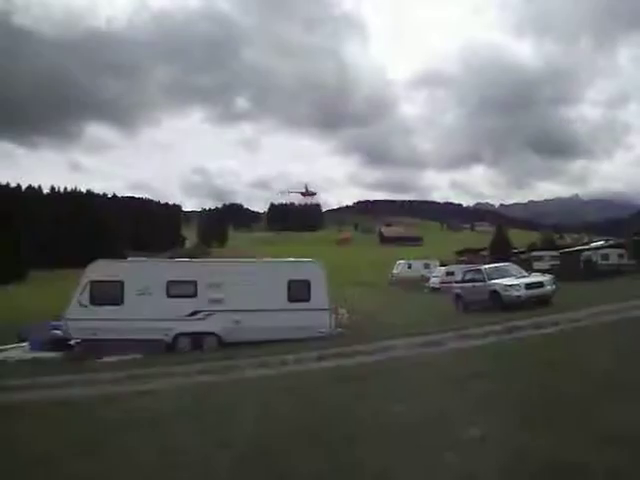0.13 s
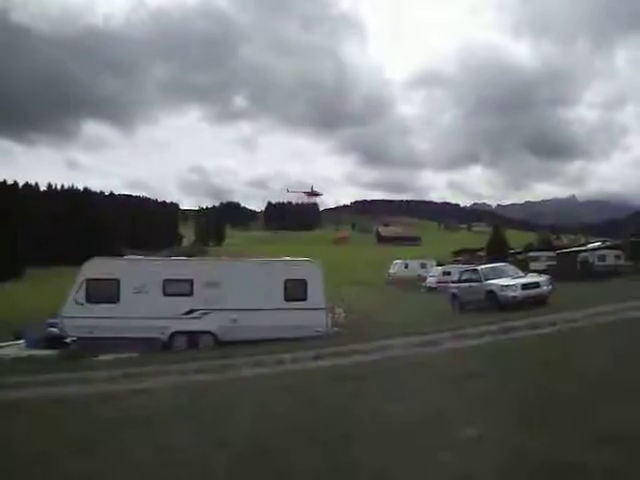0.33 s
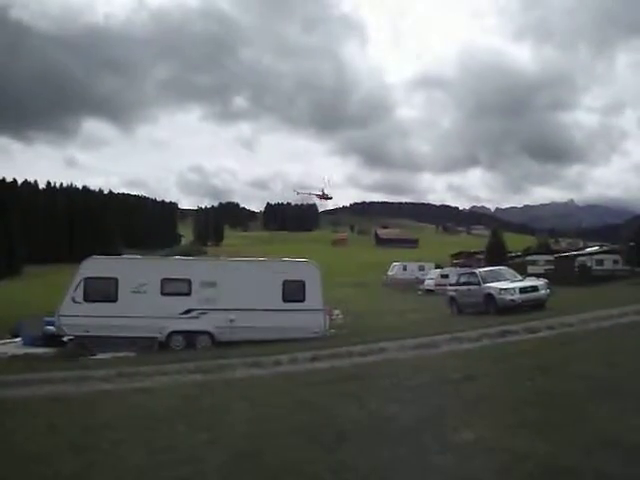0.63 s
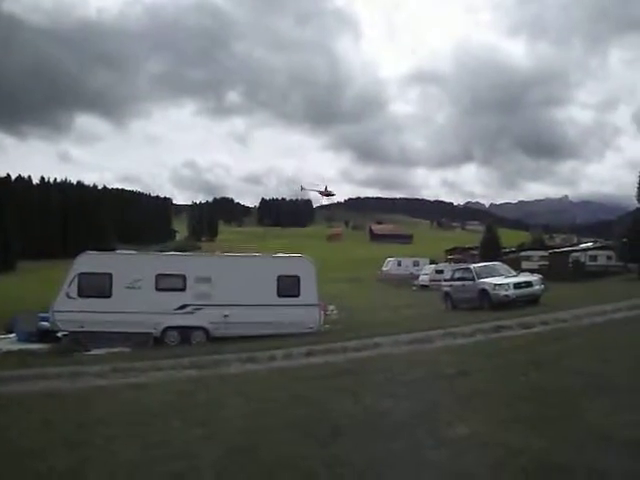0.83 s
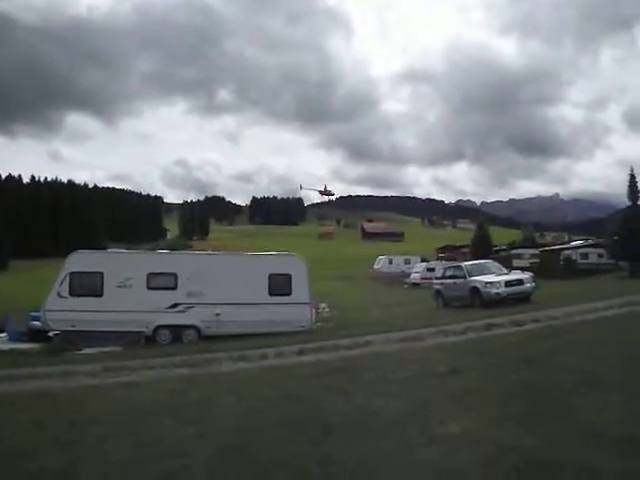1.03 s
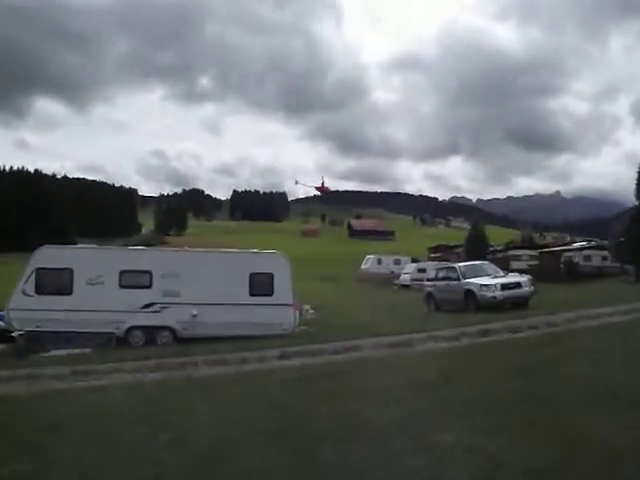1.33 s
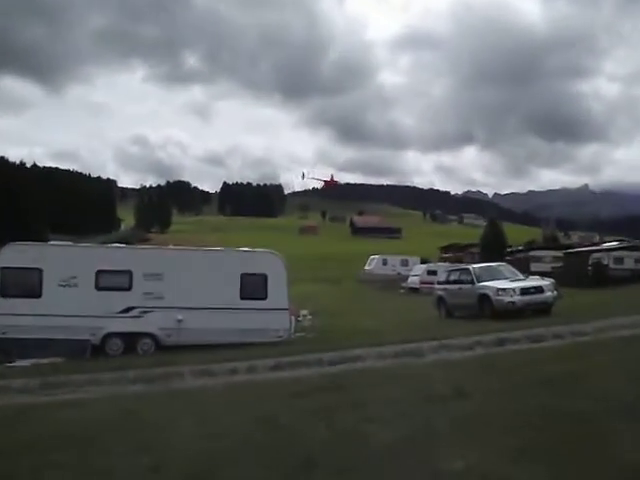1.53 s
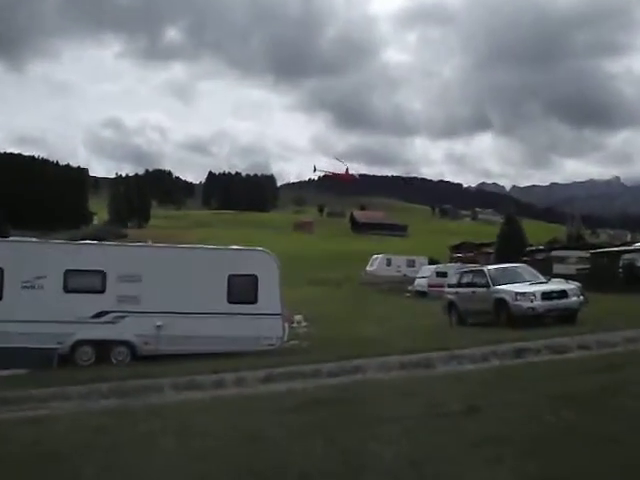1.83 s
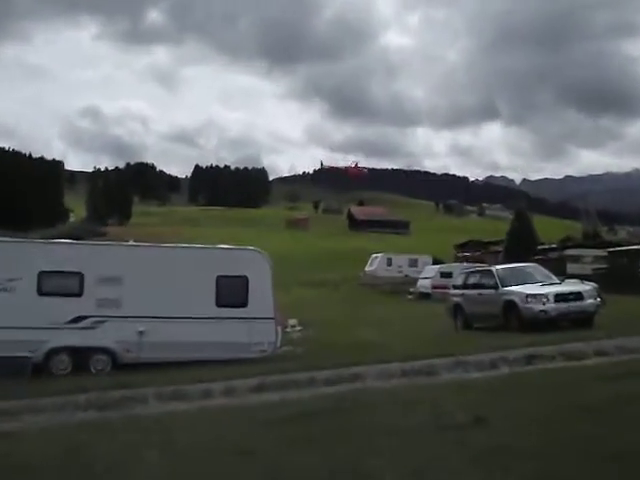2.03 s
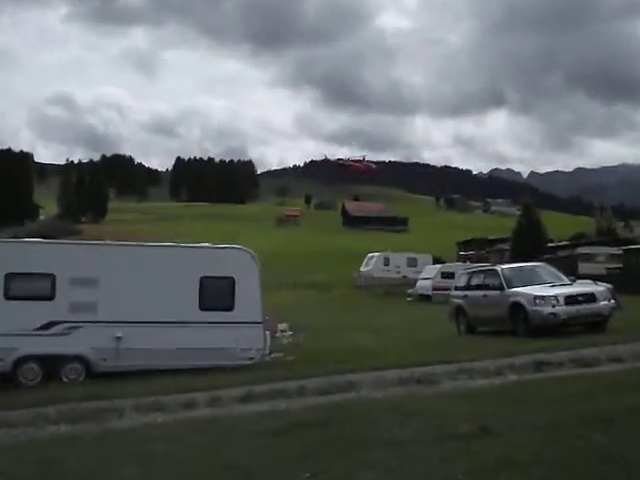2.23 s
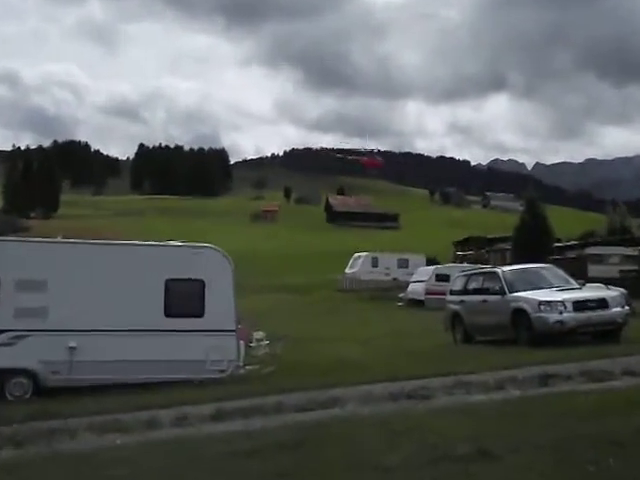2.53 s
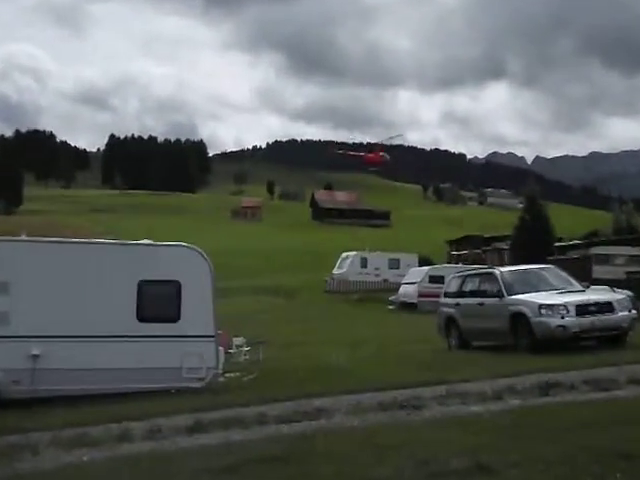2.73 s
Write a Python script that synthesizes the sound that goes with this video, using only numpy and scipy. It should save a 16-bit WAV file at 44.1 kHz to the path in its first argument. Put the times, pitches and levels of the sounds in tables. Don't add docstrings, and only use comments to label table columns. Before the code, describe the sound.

Helicopter drones and thumps in the distance over an open meadow, with rough wind on the microphone

```python
import sys
import numpy as np
from scipy import signal
from scipy.fft import rfft, irfft, next_fast_len
from scipy.io import wavfile
from scipy.ndimage import uniform_filter1d, map_coordinates

SR = 44100
rng = np.random.default_rng(int(sys.argv[2]) if len(sys.argv) > 2 else 0)


def boost(x):
    u = np.asarray(x, float) / 20
    return 10 ** u


def generate_wav(signal):
    frames = np.transpose(np.atleast_2d(signal))
    scaled = np.clip(frames, -1, 1) * 32767
    pcm = np.round(scaled).astype(np.int16)
    wavfile.write(sys.argv[1], SR, pcm)


N = 127449
T = np.arange(N) / SR
MAIN_RATIO, TAIL_RATIO = .0998, .5945


def unit(x):
    return x / np.sqrt(np.mean(x ** 2) + 1e-20)


def wobble(rate):
    return map_coordinates(rng.standard_normal(int(N * rate / SR) + 4), [T * rate])


def rush(spectrum, patchy_db, peaks=()):
    z = signal.stft(rng.standard_normal(N + 1024), nperseg=512)[2]
    patches = uniform_filter1d(rng.standard_normal(z.shape), size=6, axis=0)
    patches = uniform_filter1d(patches, size=10, axis=1)
    x = signal.istft(z * boost(patchy_db * unit(patches)), nperseg=512)[1]
    hz = np.fft.rfftfreq(len(x), 1 / SR)
    points_hz, points_db = np.transpose(spectrum)
    db = np.interp(np.log(hz + 1), np.log(points_hz + 1), points_db, left=-120, right=-120)
    db = db + sum(gain * np.exp(-((hz - centre) / width) ** 2) for centre, width, gain in peaks)
    return unit(irfft(rfft(x) * boost(db), len(x))[:N])


def rings(s, db, hz, t60, rise, glide=0):
    t, out = np.arange(SR // 20) / SR, np.zeros(N + SR)
    decay = boost(db - 60 * t / t60)
    tone = np.sin(2 * np.pi * hz * t * (1 + glide * (t / 2 - rise)))
    onset = 1 - np.exp(-t / rise)
    np.add.at(out, np.round(s * SR).astype(int) + np.arange(len(t)), decay * tone * onset)
    return out[:N]


def per_pass(passes):
    whole = np.floor(passes).astype(int)
    return rng.standard_normal(64)[whole - whole.min()]


def drone(cycles, multiples, levels_db):
    total = 0
    for multiple, db in zip(multiples, levels_db):
        level = boost(db + 1 + 1.8 * wobble(4.8))
        phase = 2 * np.pi * (multiple * cycles + rng.random())
        total = total + level * np.sin(phase + .35 * wobble(9))
    return total


# time in seconds, firing rate as
# heard in Hz.
FIRING = [
    (0, 136.8),
    (.8, 136.5),
    (1.6, 135.4),
    (2.9, 134.7),
]


def firings():
    push_at_s = 2.129
    count = np.cumsum(np.interp(T, *np.transpose(FIRING))) / SR
    return count - count[round(push_at_s * SR)]


# time in seconds, level in dB.
THUMP = [
    (0, -22),
    (1.0, -21.5),
    (1.9, -17.5),
    (2.9, -18),
]


def main_rotor(passes):
    push_s, suck_s, suck_lag_s, suck = .0046, .007, .021, .58
    period = 1 / (MAIN_RATIO * FIRING[2][1])
    s = ((passes + 0.33) % 1 - .35) * period
    push = np.exp(-.5 * (s / push_s) ** 2)
    suction = suck * np.exp(-.5 * ((s - suck_lag_s) / suck_s) ** 2)
    pulse = (push - suction) * boost(1.1 * per_pass(passes + 0.38))
    level_db = np.interp(T, *np.transpose(THUMP))
    return boost(level_db) * unit(pulse - uniform_filter1d(pulse, size=SR // 10))


# start in seconds, peak level in dB.
POPS = [(0.071, -17), (0.172, -8), (0.356, -7.5), (0.433, -19.5), (0.576, -10), (0.738, -5), (0.809, -11.5),
        (0.869, -7), (1.905, -25.5), (1.977, -17.5), (2.123, -18.5), (2.659, -11)]


def pops():
    s, db = np.array(POPS).T[:, :, None]
    hz = 460 * (1 + 0.04 * rng.standard_normal(s.shape))
    return -rings(s, db + 4, hz, t60=.016, rise=.0011)


TAIL_DB = [-29.5, -37, -42, -49.5, -45.5, -43.5]


def tail_rotor(tail):
    return drone(tail, np.arange(len(TAIL_DB)) + 1, TAIL_DB)


ENGINE_THIRDS = [3, 6, 7, 9, 10, 5]
ENGINE_DB = [-30.5, -38.5, -43, -40, -42, -48]


def engine(fired):
    return drone(fired, np.divide(ENGINE_THIRDS, 3), ENGINE_DB)


# start in seconds, peak level in dB.
SLAPS = [(0.0768, -19.5), (0.1522, -9), (0.2243, -9.5), (0.397, -8), (0.4394, -12), (0.4862, -14.5),
         (0.595, -13), (0.7252, -6), (0.738, -11), (0.8859, -6.5), (0.9556, -3.5), (1.036, -3),
         (1.1448, -7.5), (1.2241, -6), (1.3096, -7.5), (1.3741, -5), (1.4755, -11), (1.701, -7),
         (1.769, -6), (1.9215, -20.5), (2.1385, -10), (2.2235, -6.5), (2.2915, -6), (2.333, -11),
         (2.511, -13.5), (2.6703, -9.5), (2.7362, -3)]


def slaps():
    rise_s, fall_s = .002, .0067
    start, db = np.array(SLAPS).T
    after = np.maximum(T - start[:, None], 0)
    return boost(db - 13) @ (np.exp(-after / fall_s) * (1 - np.exp(-after / rise_s)))


# frequency in Hz, density in dB per Hz.
HIGH_ROAR = [(600, -39), (950, -14), (2110, -8.5), (2860, 0), (3300, -10.5), (3990, -14.5), (5280, -21.5),
             (6600, -38)]
# centre in Hz, width in Hz, gain in dB.
CAVITY = [
    (2860, 420, 2.5),
    (3307, 93, -5),
]
# frequency in Hz, density in dB per Hz.
LOW_ROAR = [(90, -9), (150, 4), (300, -3), (480, -0.5), (750, -1), (1100, -12.5), (1600, -23)]


def roar(passes, tail, level_db, low_db):
    u = passes - .34
    swish_db = 2 * (u % 1 - .5) * (1 + .35 * per_pass(u))
    swish_db = uniform_filter1d(swish_db, size=200)
    flutter = 1 + .11 * np.sin(2 * np.pi * tail) + .12 * np.sin(4 * np.pi * tail)
    drift_db, grit_db = .9 * wobble(25.214), 2 * wobble(170)
    body = boost(level_db + swish_db + drift_db + grit_db) * flutter
    noise = rush(HIGH_ROAR, 1.0, CAVITY) + boost(low_db) * rush(LOW_ROAR, 2.6)
    return (body + slaps()) * noise


# start in seconds, peak level in dB, frequency in Hz.
TICKS = [
    (0.552, -6, 1460),
    (0.6349, -10, 1500),
    (0.7826, -19.5, 1630),
    (0.886, -15, 1670),
    (0.9657, -14, 1500),
    (1.0056, -12.5, 1560),
    (1.3887, -27, 1570),
    (2.8505, -14, 1420),
]


def ticks():
    s, db, hz = np.array(TICKS).T[:, :, None]
    return rings(s, db + 6, hz, t60=.018, rise=.0016, glide=30)


# start in seconds, level in dB, frequency in Hz.
CRACKS = [(.487, -3, 3000), (.632, -4, 2900), (.634, -11, 5500), (.634, -12, 4300), (.868, -26, 5900),
          (.888, -3, 2800), (1.315, -22, 5000), (1.702, -3, 2800), (2.14, -4, 2700), (2.295, -6, 2900),
          (2.296, -20, 5200), (2.669, -5, 2700), (2.67, -17, 5400)]


def cracks():
    return rings(*np.array(CRACKS).T[:, :, None], t60=.011, rise=.0005)


# centre in seconds, half length in seconds, swell in dB.
GUSTS = [
    (0.086, .04, 9),
    (0.202, .05, 7),
    (.73, 0.083, 9.5),
    (0.808, 0.06, 8),
    (1.636, 0.043, 7.5),
    (2.075, 0.12, 2.5),
    (2.671, .06, 3.5),
]
# frequency in Hz, density in dB per Hz.
RUMBLE = [(8, -6), (28, 0), (60, -7), (110, -13), (200, -22), (300, -40)]


def wind():
    gust_db = sum(db * np.exp(-((T - s) / half) ** 2) for s, half, db in GUSTS)
    return boost(-32 + gust_db + 3 * wobble(9)) * rush(RUMBLE, 1.5)


# time in seconds, roar in dB, engine drone in dB, low roar in dB over the roar.
FLIGHT = [(.08, -24, -6, 0.5), (0.298, -24, 5, -1.5), (.45, -22.5, 1.5, -5), (0.649, -23.5, -0.5, -4.5),
          (0.852, -20.5, 1.5, -2), (1.001, -22, -6, -8), (1.2, -21.5, 1, -10.5), (1.4, -22, -1.5, -12),
          (1.55, -22.5, 1.5, -7), (1.7, -24, -6, -5.5), (1.901, -22.5, 3, -4), (2.1, -22, 0.5, -9),
          (2.299, -19.5, 2, -12), (2.499, -24.5, -1, -8.5), (2.7, -19.5, 5, -10), (2.89, -19, 7, -7.5)]


def scene():
    s, *columns = np.transpose(FLIGHT)
    roar_db, engine_db, low_db = [np.interp(T, s, column) for column in columns]
    fired = firings()
    passes, tail = fired * MAIN_RATIO, fired * TAIL_RATIO
    rotors = main_rotor(passes) + pops() + tail_rotor(tail)
    power = boost(engine_db) * engine(fired) + roar(passes, tail, roar_db, low_db)
    return (rotors + power + ticks() + cracks() + wind())[None]


# start in seconds, depth in dB.
DUCKS = [(0.084, 4), (.232, 5.5), (0.751, 1.5), (.895, 2), (.972, 2.5), (1.285, -1.5), (1.714, -0.5),
         (1.928, 4.5), (2.16, 5), (2.365, 3), (2.528, 3.5), (2.755, 5)]


def gain_control(x):
    hold_s, release_s = .02, .052
    s, depth_db = np.array(DUCKS).T[:, :, None]
    recovery = np.exp(-np.maximum(T - s - hold_s, 0) / release_s)
    duck_db = np.sum(depth_db * (T > s) * recovery, axis=0)
    return x * boost(1.0 - uniform_filter1d(duck_db, size=300))


def microphone_band(x):
    size = next_fast_len(N + 8192)
    hz = np.fft.rfftfreq(size, 1 / SR)
    low_cut = hz / np.hypot(hz, 15)
    treble = boost(-13.5 * np.maximum(hz - 4005, 0) / 1000)
    top = np.clip((6500 - hz) / 500, 0, 1) ** 2
    return irfft(rfft(x, size) * (low_cut * treble * top), size)[:, :N]


def band_limit(x):
    return signal.sosfilt(signal.butter(12, 16000, fs=SR, output="sos"), x)


def record(dry):
    start_s, ceiling = .0722, .85
    x = gain_control(dry)
    x = x / (1 + (x / ceiling) ** 4) ** .25
    x = microphone_band(x)
    x = x * np.clip((T[-1] - T) / .003, .8, 1)
    x = x + boost(-13) * np.exp(-np.abs(T - start_s) / .0002)
    return band_limit(x * (T > start_s))


dry = scene()
out = record(dry)
generate_wav(out)
```